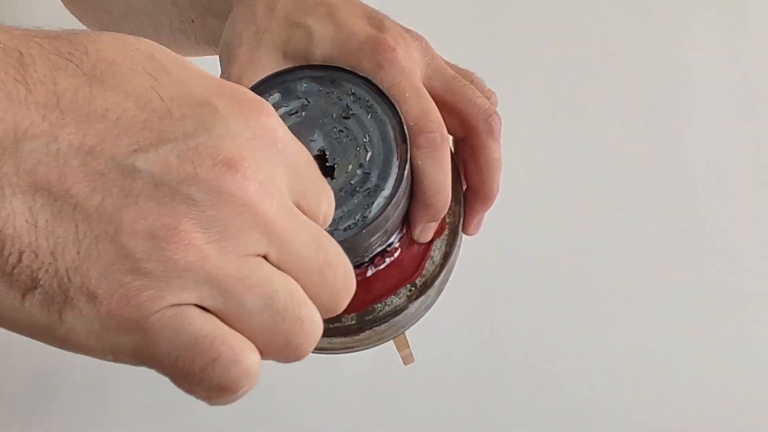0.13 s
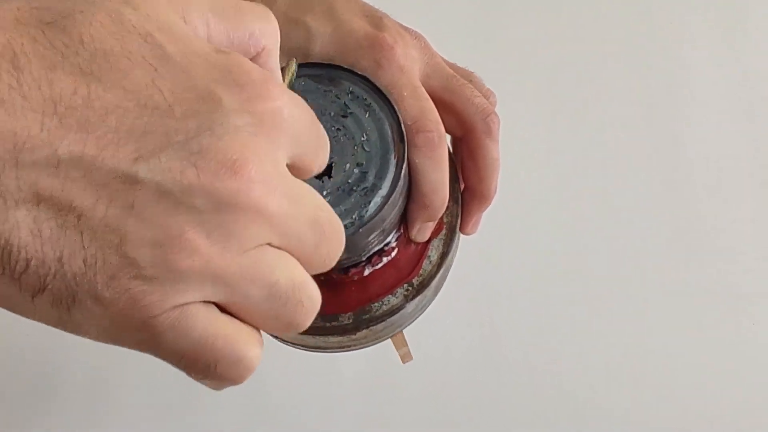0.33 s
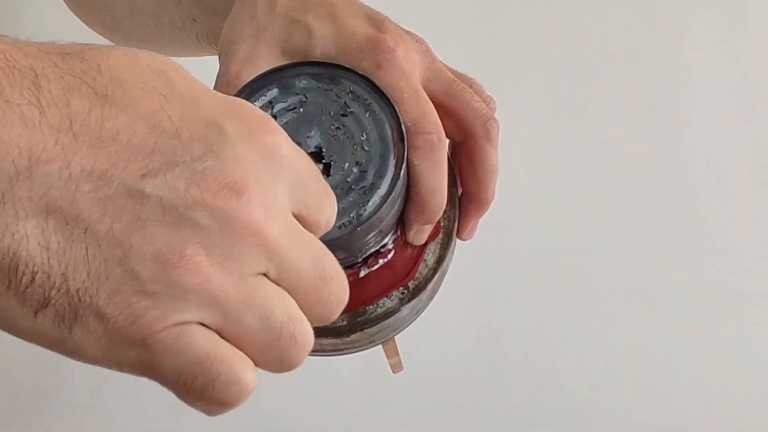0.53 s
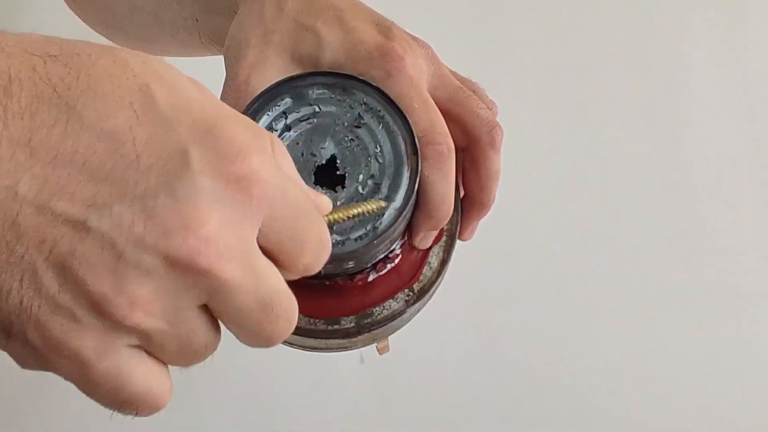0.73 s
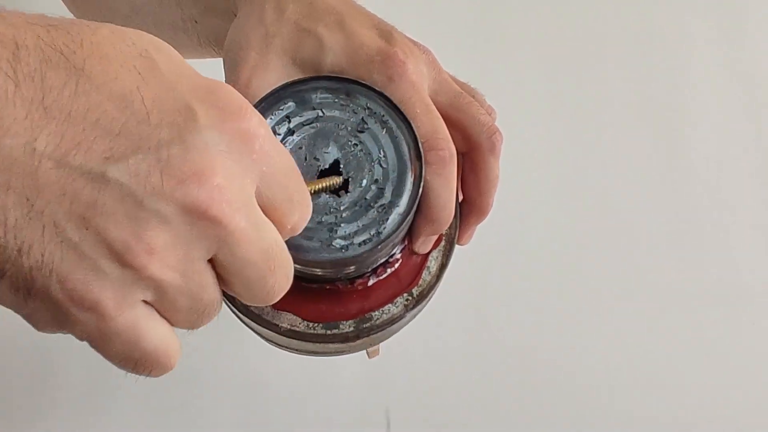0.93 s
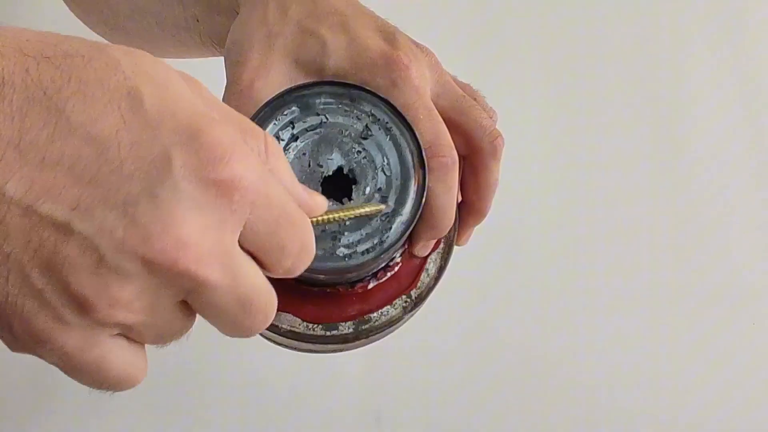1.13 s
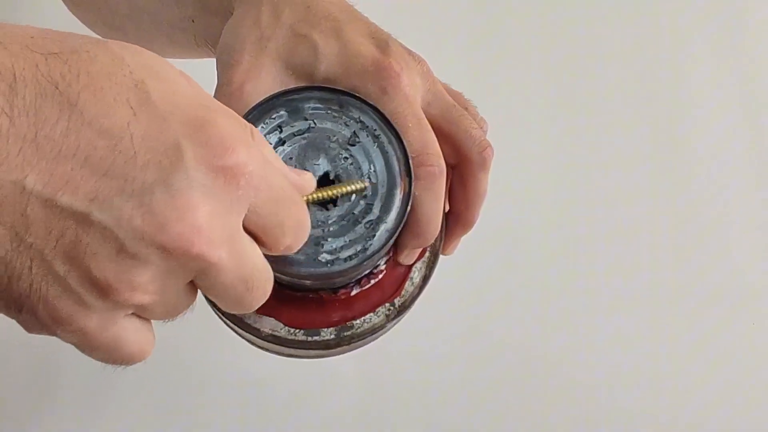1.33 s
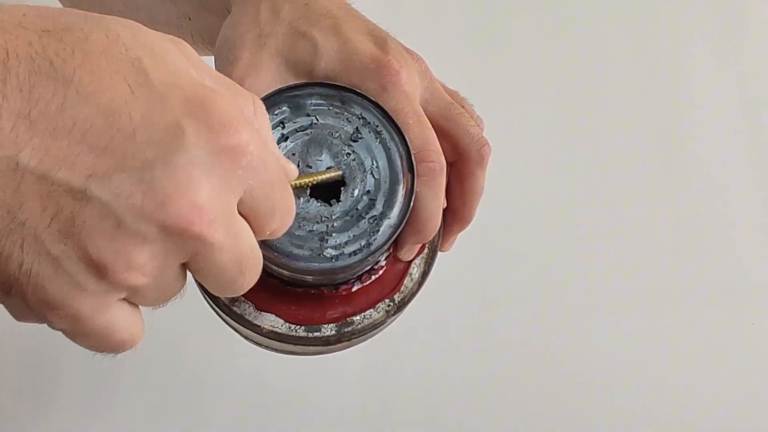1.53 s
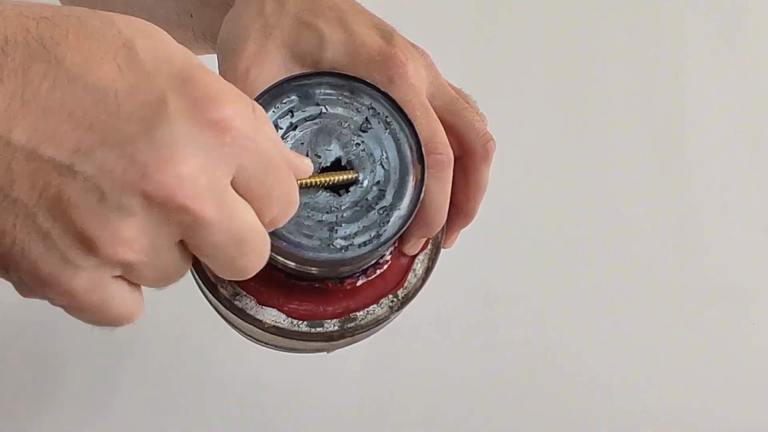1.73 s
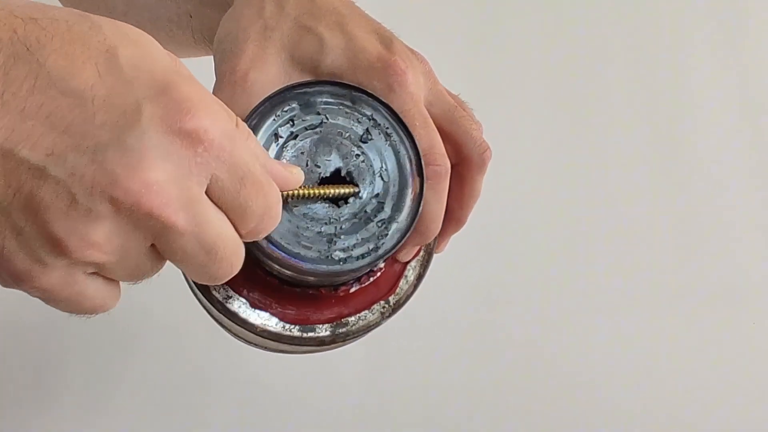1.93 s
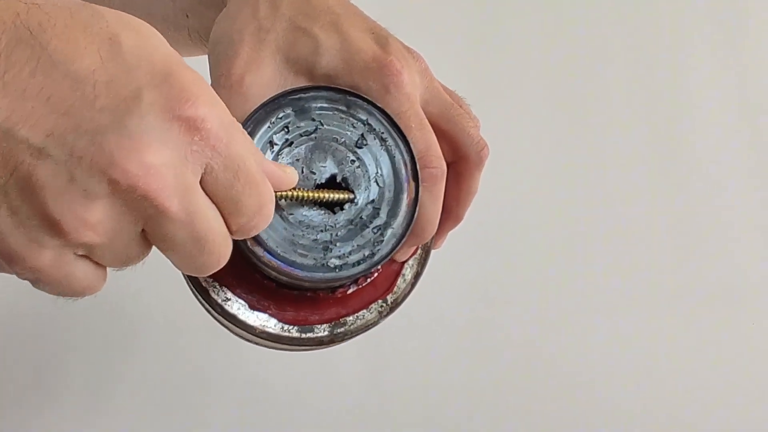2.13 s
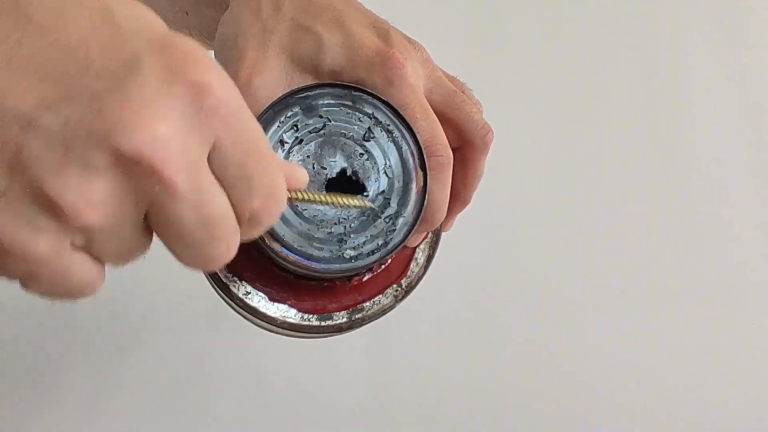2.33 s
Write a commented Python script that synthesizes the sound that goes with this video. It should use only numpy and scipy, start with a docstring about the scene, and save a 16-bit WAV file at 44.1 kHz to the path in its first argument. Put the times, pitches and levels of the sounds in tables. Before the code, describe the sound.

Close up in a small room, a screw rasps against a corroded tin lid in brief, uneven bursts. Faint rubbing links the crunchy scrapes, a few leave a thin metallic ring, and a low hum sits underneath.

```python
"""A small room, the microphone close to a hand-held tin. The dull echo of an earlier scrape dies away,
then a screw is dragged through a rusty hole in the lid, rubbing faintly as its thread catches and slips
in short clusters. Each slip is a crunch of rust grains that rings the lid near 1 kHz, rasps through its
higher modes and sprays grit; a few leave the tin's wall singing. The room answers, over a low rumble,
faint hiss and hum."""
import sys
import numpy as np
from scipy import signal
from scipy.fft import rfft, irfft
from scipy.io import wavfile

SR = 44100
rng = np.random.default_rng(int(sys.argv[2]) if len(sys.argv) > 2 else 0)


def materialize(psi):
    """Save the field psi as 16-bit PCM at rate SR to the path in sys.argv[1].

    A 1-D psi becomes a single channel; in a 2-D psi each row is a channel.
    """
    bounded = np.clip(np.atleast_2d(psi).T, -1, 1)
    quanta = np.round(bounded * 32767).astype(np.int16)
    wavfile.write(sys.argv[1], SR, quanta)


N = 110250
LID_HZ = 1000  # nominal pitch of the lid; each slip shifts it


def amp(db):
    return 10 ** (np.asarray(db) / 20)


def unit(x):
    """Scales to energy 1."""
    return x / np.sqrt(np.sum(x ** 2) + 1e-20)


def read(points, hz):
    """Reads a spectrum on a log-frequency axis."""
    f, value = np.transpose(points)
    return np.interp(np.log(hz + 1), np.log(f + 1), value)


def level(points):
    """Gain over the whole scene from points of time in seconds and level in dB."""
    return amp(np.interp(np.arange(N) / SR, *np.transpose(points)))


def add(mix, start_s, sound):
    part = mix[max(round(start_s * SR), 0):][:len(sound)]
    part += sound[:len(part)]


def convolve(x, response):
    return signal.fftconvolve(x, response)[:len(x)]


def high_pass(x, hz):
    return signal.lfilter(*signal.butter(4, hz, "high", fs=SR), x)


def tint(x, spectrum):
    """Colours a long sound."""
    return irfft(rfft(x) * amp(read(spectrum, np.fft.rfftfreq(len(x), 1 / SR))), len(x))


def click(spectrum, size=4096):
    """A causal click of the given colour."""
    log_gain = np.log(amp(read(spectrum, abs(np.fft.fftfreq(size, 1 / SR)))))
    minimum_phase = np.exp(np.conj(signal.hilbert(log_gain)))
    return unit(np.fft.ifft(minimum_phase).real)


def ring(modes, stretch=1, size=4096):
    """Dying sines; the point of contact changes the share of each."""
    hz, db, t60 = np.transpose(modes)[:, :, None]
    t = np.arange(size) / SR
    share_db = 3 * rng.uniform(-1, 1, hz.shape)
    return (amp(db + share_db - 60 * t / t60) * np.sin(2 * np.pi * hz * stretch * t)).sum(0)


def room_tone(floor_db=-57.5, hum_hz=52.3):
    """Behind the tin: low rumble, faint hiss and a hum that swells towards the end."""
    # The hum's swell. Each row: time in seconds, level in dB.
    swell = [(0, -73), (1.7, -62.5), (2.15, -57.5), (2.5, -62)]
    # Colour of the rumble and hiss. Each row: frequency in Hz, relative level in dB.
    colour = [(10, 9), (25, 2.5), (38, 5), (55, -11.5), (75, -7.5), (120, -16), (220, -13), (400, -32.5),
              (1000, -27), (2500, -42), (6000, -44), (14000, -51.5)]
    hum = np.sqrt(2) * level(swell) * np.sin(2 * np.pi * (hum_hz * np.arange(N) / SR + rng.random()))
    noise = np.sqrt(N) * unit(tint(rng.standard_normal(N), colour))
    return amp(floor_db) * noise + hum


def rust_grains(size, per_second=9000, spread_db=2.5):
    """Rust breaking: sparse clicks of uneven size."""
    strength = amp(spread_db * np.minimum(rng.exponential(1, size), 4))
    return strength * rng.choice([-1., 1.], size) * (rng.random(size) < per_second / SR)


def contact_clicks():
    """The bare contact of screw on tin: four clicks, dull to bright, levelled against the modes."""
    # Colours of the four clicks. Each row: frequency in Hz, relative level in dB.
    knock = [(40, -36), (110, -45), (200, -6), (350, 10), (520, 4.5), (650, -8), (1500, -15.5), (5000, -60)]
    tap = [(200, -13.5), (600, 16), (800, -25), (1200, 0.5), (1700, -13.5), (5000, -79.5)]
    rasp = [(300, -40.5), (900, -1.5), (1400, 6.5), (2200, 1), (3400, 0), (4700, -25.5), (6500, -15.5),
            (14000, -32.5)]
    grit = [(1500, -47), (4000, 4), (5300, 5), (6500, 5.5), (7500, 1), (9000, 1), (11200, 2), (12500, -7.5),
            (14500, -1.5)]
    return [amp(-8.5) * click(knock), amp(-11) * click(tap), amp(-3.5) * click(rasp), amp(7) * click(grit)]


def tin_responses(contacts, pitch_hz):
    """What one grain sets off: belly, lid, sheet and edge, each with its bare contact click."""
    # The tin's modes. Each row: frequency in Hz, relative level in dB, seconds to fall 60 dB.
    belly = [(203, -5, 0.021), (300, -10.5, 0.019), (439.4, -5, 0.028), (506, 2.5, 0.068)]  # low modes of the whole tin, damped by the hand
    lid = [(700, -26, .015), (800, -20, 0.026), (1010, 2.5, 0.026), (979.4, 16.5, 0.023),
           (1070, 10.5, 0.026), (1070, -21, 0.17)]  # main modes of the lid
    sheet = [(1380, -17, .02), (1514, 9, 0.061), (1660, -4, 0.051), (1745, 1.5, 0.014), (1925, 5, 0.042),
             (2252, -5, 0.11), (2393, -35, 0.0082), (2822, -0.5, .025), (3224, -2, 0.0096),
             (3470, 6, 0.0067), (3850, 2.5, 0.0091), (4350, -5, 0.018), (4602, -37, 0.07)]  # higher modes of its sheet metal
    edge = [(4970, -9.5, 0.0027), (5690, -2, .022), (6400, -6.5, 0.0036), (7360, 0, 0.0081),
            (11880, -14, 0.032)]  # the screw and the torn edge
    bodies = (high_pass(ring(belly), hz=189),  # each part carries little sound below its own range
              high_pass(ring(lid, pitch_hz / LID_HZ), hz=492),
              high_pass(ring(sheet), hz=1000),
              high_pass(ring(edge), hz=3330))
    return [unit(body) + contact for body, contact in zip(bodies, contacts)]


def echo_and_rubbing(contacts, top_hz=3720):
    """An earlier scrape's dull room echo dies away over 0.2 s; then the screw rubs faintly on the lid."""
    # Echo up to 0.22 s, rubbing after. Each row: time in seconds, level in dB ahead of the filters.
    strength = [(0, -45.5), (.03, -51), (.1, -63), (.22, -74.5), (.28, -68), (.38, -54), (.47, -63),
                (.52, -74), (.65, -61), (.76, -62), (.9, -75), (1.1, -79), (1.3, -63.5), (1.36, -57),
                (1.42, -73), (1.65, -79.5), (1.82, -62.5), (1.97, -67.5), (2.1, -69), (2.25, -74.5),
                (2.5, -80)]
    belly, lid, sheet, _ = map(unit, tin_responses(contacts, LID_HZ))
    grains = np.sqrt(N) * unit(rust_grains(N)) * level(strength)
    force = signal.lfilter(*signal.butter(2, top_hz, fs=SR), grains)
    return convolve(force, amp(-14) * belly + lid + amp(-3) * sheet)


def afterring(tin):
    """Parts of the tin that the hand does not damp sing along."""
    # Undamped modes. Each row: frequency in Hz, gain in dB, seconds to fall 60 dB.
    modes = [(494, -61.5, 0.33), (992.5, -59, 0.23)]
    return convolve(tin, ring(modes, size=SR))


def room(x, early_db=-8, early_t60_s=0.027):
    """Quick reflections off bench and hands reach the microphone, then the room's short tail."""
    # Decay of the tail. Each row: frequency in Hz, seconds to fall 60 dB.
    decay = [(200, 0.56), (600, 0.51), (1100, 0.43), (2000, 0.46), (4500, 0.41), (8000, 0.21), (14000, .18)]
    # Colour of the tail. Each row: frequency in Hz, gain in dB.
    colour = [(150, -14), (380, -11.5), (500, -14.5), (700, -9.5), (980, -13), (1200, -13), (1550, -4),
              (2100, -9), (4500, -8.5), (8000, -1.5), (14000, -13)]
    t = np.arange(SR) / SR
    reflections = rng.standard_normal(SR) * (rng.random(SR) < .02) * (t > .003)
    early = unit(reflections * amp(-60 * t / early_t60_s))
    hz, frame_s, bands = signal.stft(rng.standard_normal(SR), SR, nperseg=256)
    t60 = read(decay, hz)[:, None]
    equal_energy = np.sqrt(2 * np.log(1000) / (t60 * SR))
    bands = bands * amp(-60 * frame_s / t60) * equal_energy
    tail = signal.istft(bands, SR, nperseg=256)[1][:SR] * np.minimum(t / 0.013, 1)
    return convolve(x, amp(early_db) * early + tint(tail, colour) * (t < .9))


def slips(contacts, judder_db=-7, bite_db=4.5, size=4096):
    """The thread lets go, gathers speed and crunches on to the next catch."""
    # Each row is one slip: start in seconds, crunch length in seconds, lid pitch in Hz, bite pitch in Hz,
    # then the levels of thud, lid, rasp and grit in dB, each as if its energy were spread over 10 ms.
    crunches = [(0.237, 0.0032, 1000, 1830, -52.5, -39.5, -45.5, -61.5),
                (0.243, 0.0084, 1047, 2640, -53.5, -37, -43.5, -78),
                (0.251, 0.0027, 1020, 3260, -47, -35, -58, -61),
                (0.255, 0.0091, 949, 3010, -59, -36, -43, -53.5),
                (0.262, 0.0044, 1023, 2910, -50, -34, -41, -61),
                (0.268, 0.012, 972, 2750, -56, -40, -48, -79),
                (0.283, 0.0059, 1073, 1650, -69, -39.5, -46, -79),
                (0.31, 0.0057, 1005, 1950, -55.5, -35.5, -38, -51),
                (0.325, 0.0025, 1090, 1870, -47, -36, -36.5, -61),
                (0.338, 0.0063, 967, 2030, -41.5, -23, -37, -64.5),
                (0.507, 0.0069, 1040, 1820, -63, -76, -64, -95),
                (0.598, 0.0034, 1050, 2200, -63, -50, -67, -73),
                (0.603, 0.0024, 1000, 3000, -63, -53, -57, -64),
                (0.613, 0.0064, 1044, 2470, -69, -41.5, -55, -61),
                (0.621, 0.0033, 965, 2880, -52.5, -43, -47.5, -60.5),
                (0.678, 0.0018, 910, 3180, -46.5, -38, -55, -63),
                (0.681, 0.0022, 1047, 2860, -57, -37.5, -36.5, -56),
                (0.687, 0.0059, 1020, 1740, -56, -41.5, -41, -57.5),
                (0.694, 0.0038, 989, 2910, -56, -36, -46, -55),
                (0.7, 0.0022, 1040, 2560, -51, -34.5, -43.5, -60),
                (0.72, 0.0022, 1046, 2910, -68, -41, -49.5, -65),
                (0.725, 0.0023, 1010, 2550, -64, -47, -49, -79),
                (1.037, 0.002, 960, 2010, -53.5, -43, -43, -59),
                (1.043, 0.0057, 966, 2690, -54, -34.5, -40, -47.5),
                (1.047, 0.0083, 1010, 2560, -55, -33.5, -40.5, -66),
                (1.063, 0.0022, 987, 2600, -55, -36.5, -35.5, -54),
                (1.069, 0.0027, 960, 2550, -53.5, -54, -44.5, -62),
                (1.082, 0.00097, 1040, 2900, -50, -47, -43, -51),
                (1.085, 0.0064, 1053, 2100, -55, -39, -43, -69),
                (1.122, 0.0092, 979, 3410, -48, -39, -47, -57),
                (1.136, 0.0021, 1040, 3350, -68, -35, -47, -56.5),
                (1.14, 0.0037, 968, 3110, -46, -37.5, -42.5, -52.5),
                (1.148, 0.0067, 1110, 2750, -60, -47, -49, -76),
                (1.318, 0.0022, 1010, 2620, -56, -49, -56.5, -70),
                (1.324, 0.0085, 1040, 3230, -53, -46.5, -52.5, -76),
                (1.333, 0.0048, 976, 1830, -66, -36, -45, -61),
                (1.443, 0.0046, 1010, 2060, -92.5, -70, -68.5, -76),
                (1.696, 0.0063, 1030, 3020, -55, -43.5, -56.5, -63.5),
                (1.707, 0.0094, 982, 3270, -83, -37.5, -51, -58),
                (1.73, 0.0055, 964, 3240, -51.5, -37, -37, -49),
                (1.747, 0.0041, 914, 2270, -61, -39, -37, -54.5),
                (1.754, 0.0012, 1004, 2440, -43.5, -34.5, -46, -54),
                (1.758, 0.0045, 920, 1930, -50.5, -57, -40.5, -67),
                (1.838, 0.0063, 1050, 1960, -75, -65, -60, -67.5),
                (1.892, 0.0069, 1010, 2550, -63, -50.5, -58.5, -74),
                (1.904, 0.022, 1053, 3030, -58, -62, -58.5, -70.5),
                (1.922, 0.0013, 988.0, 2260, -57.5, -54.5, -50, -74),
                (1.927, 0.0042, 1035, 2630, -63, -46.5, -62, -70.5),
                (1.933, 0.0062, 975, 2540, -61, -45.5, -57.5, -71),
                (2.0, 0.0028, 1033, 2690, -48, -36, -49, -64.5),
                (2.004, 0.0011, 1070, 2680, -52.5, -44.5, -49, -77),
                (2.116, 0.005, 1033, 2440, -64, -59.5, -77, -88),
                (2.185, 0.0031, 1010, 1940, -72, -72, -75.5, -82),
                (2.253, 0.014, 915, 3250, -61, -58, -58.5, -59.5),
                (2.262, 0.0037, 902, 3360, -46.5, -40, -43, -75)]
    out, t = np.zeros(N), np.arange(size) / SR
    for start, length, pitch_hz, bite_hz, *levels in crunches:
        progress = t / max(length, .001)
        rise, fade = np.minimum(progress / 0.49, 1), np.exp(-(progress / 1.43) ** 2)
        scratch = unit(rust_grains(size) * rise * fade)
        # The slipping tip briefly locks to the lid's main mode.
        judder = unit(np.sin(2 * np.pi * pitch_hz * t) * np.exp(-(progress / 0.79) ** 2))
        # Each catch stresses one broad region of the rasp.
        bite = signal.lfilter(*signal.iirpeak(bite_hz, Q=4.3, fs=SR), scratch)
        forces = scratch, scratch + amp(judder_db) * judder, scratch + amp(bite_db) * bite, scratch
        for db, force, response in zip(levels, forces, tin_responses(contacts, pitch_hz)):
            add(out, start, amp(db) * np.sqrt(.01 * SR) * unit(convolve(force, response)))
    return out


def wall_ring(hz=1156.5, t60_s=0.66):
    """Some slips leave the free wall of the tin ringing with one thin, lasting tone."""
    # Rings of the wall. Each row: start in seconds, level in dB.
    rings = [(0.703, -51), (1.143, -54.5), (1.335, -54), (1.999, -62.5), (2.265, -59.5)]
    out, t = np.zeros(N), np.arange(SR) / SR
    for start, db in rings:
        add(out, start, np.sqrt(2) * amp(db - 60 * t / t60_s) * np.sin(2 * np.pi * hz * t))
    return out


def treble_flutter(mid, top_hz=450):
    """The side signal: the treble flutters at random between left and right."""
    # Stereo width. Each row: frequency in Hz, gain of the side signal in dB.
    width = [(100, -52), (2600, -62), (4000, -45), (6000, -12), (8000, -6.5), (14000, -6)]
    flutter = signal.sosfilt(signal.butter(2, top_hz, fs=SR, output="sos"), rng.standard_normal(N))
    return tint(mid * np.tanh(2 * np.sqrt(N) * unit(flutter)), width)


def scene():
    """The tin sits close and centred in front of the microphone, with the room behind it."""
    contacts = contact_clicks()
    tin = slips(contacts) + echo_and_rubbing(contacts)
    tin = tin + afterring(tin)
    mid = tin + room(tin) + wall_ring() + room_tone()
    side = treble_flutter(mid)
    return np.array([mid + side, mid - side])


def record(dry):
    """The recorder's band ends at 14.5 kHz."""
    low_pass = signal.firwin(411, 14500, window=("kaiser", 8), fs=SR)
    return signal.oaconvolve(dry, low_pass[None], "same")


dry = scene()
out = record(dry)
materialize(out)
```